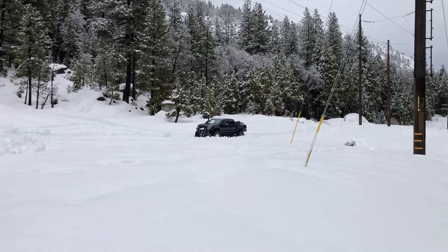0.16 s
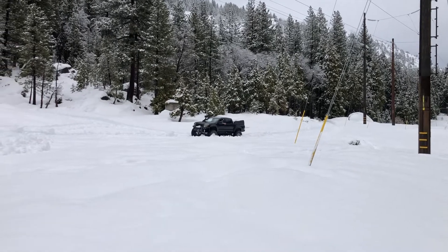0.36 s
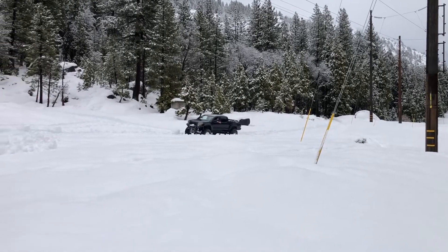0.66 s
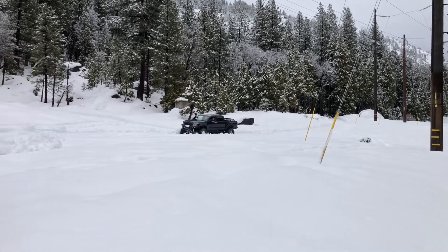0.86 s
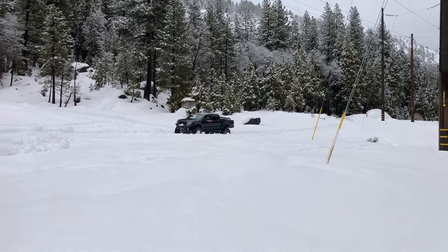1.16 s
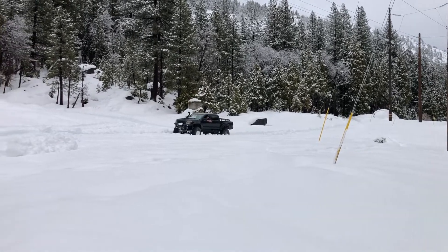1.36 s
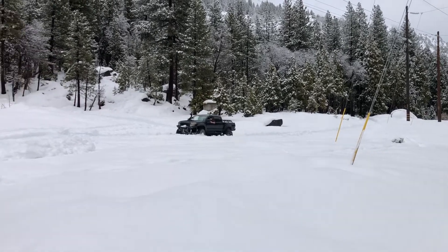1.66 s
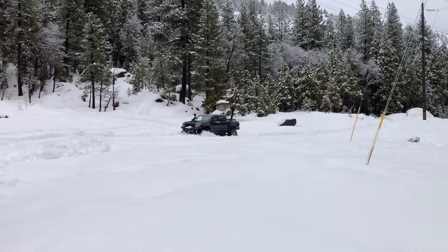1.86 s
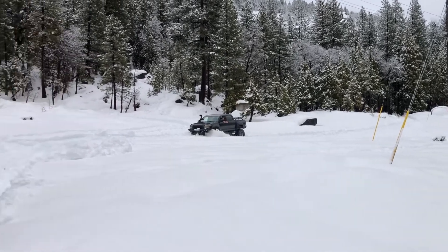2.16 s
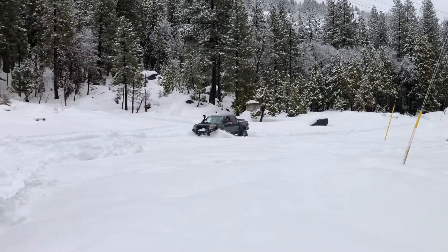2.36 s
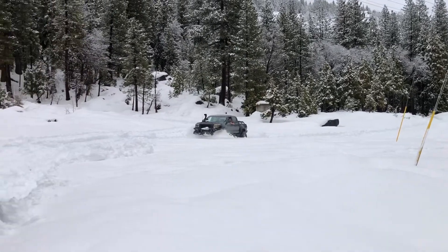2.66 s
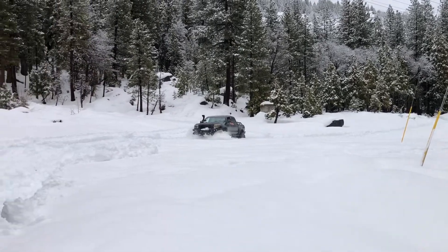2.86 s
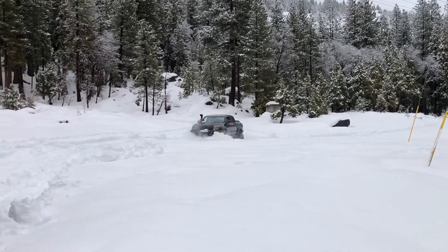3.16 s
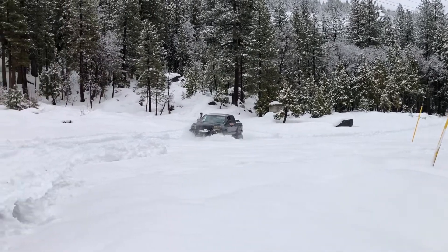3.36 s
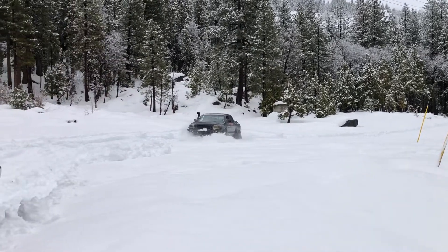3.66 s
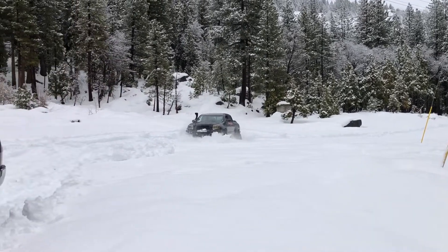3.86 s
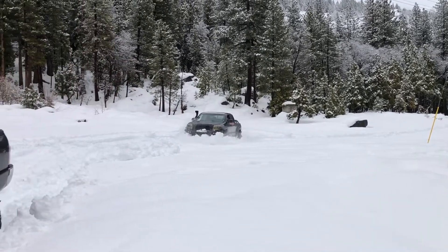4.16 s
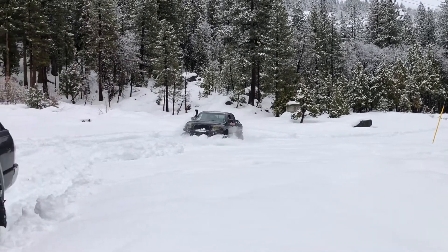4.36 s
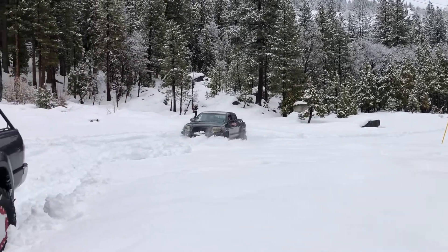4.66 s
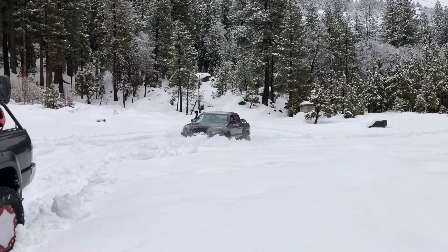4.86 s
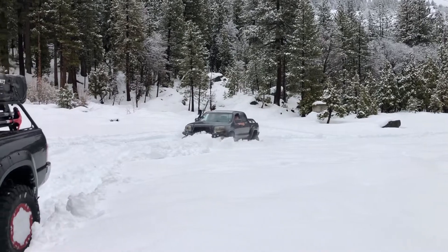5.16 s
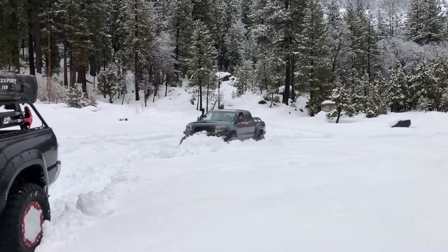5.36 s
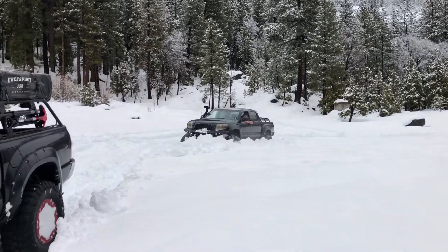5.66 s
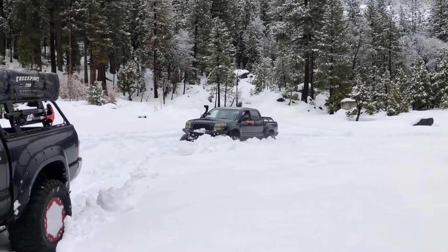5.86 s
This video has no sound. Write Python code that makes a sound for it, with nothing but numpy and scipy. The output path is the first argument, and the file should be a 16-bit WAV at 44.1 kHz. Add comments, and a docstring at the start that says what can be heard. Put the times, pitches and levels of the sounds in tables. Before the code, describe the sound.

A pickup truck ploughs through deep snow at high revs, its exhaust droning and stumbling over a hiss of spray.

```python
"""Pickup ploughing through deep snow

One microphone by a line of trees, some way off from a six-cylinder pickup that revs up and holds high
revs. Its exhaust drones and rasps, ducks as the truck pitches, and stumbles now and then.
The engine bay roars, the spinning tyres fling hissing snow, and a soft steady rush lies under it all."""
import sys
import numpy as np
from scipy import signal
from scipy.fft import rfft, irfft, next_fast_len
from scipy.io import wavfile
from scipy.ndimage import uniform_filter1d, map_coordinates

SR = 44100
rng = np.random.default_rng(int(sys.argv[2]) if len(sys.argv) > 2 else 0)


def digitize_waveform(pressure):
    """Quantize a signal to 16-bit integers and store it at the path in sys.argv[1].

    Rows of a 2-D input are taken as channels; values are limited to [-1, 1].
    """
    field = np.atleast_2d(pressure).T
    bounded = np.clip(field, -1, 1)
    quanta = np.round(bounded * 32767).astype(np.int16)
    wavfile.write(sys.argv[1], SR, quanta)


N = 265041
T = np.arange(N) / SR

# Bursts of uneven firing. Each row: time in seconds, level in dB.
STUMBLES = [(1.54, -42), (1.71, -43), (2.76, -34.5), (2.825, -34.5), (3.28, -29.5), (3.465, -28),
            (3.535, -29.5), (4.115, -31), (4.335, -26), (4.475, -26.5), (4.61, -28), (4.7, -24.5),
            (5.305, -28.5)]
# The six cylinders. Each entry: relative strength of its firing in dB.
CYLINDERS = [9.5, -19, 5, -19, -45, 15.5]


def exhaust(speed, cycle, count, load_db, duck_db, flare_s=0.01):
    """The tailpipe: drone, rasp and stumbles, driven by the load and ducking as the truck pitches."""
    # Upper registers against the boom. Each row: time in seconds, then body, bark and rasp in dB.
    tone = [(1.2, 9, -4, -24), (1.4, 2, 1, -32), (1.55, 3, 1.5, -23), (1.82, 5.5, 0.5, -4),
            (2.02, 2, -10.5, -8.5), (2.22, 1.5, -7, -16), (2.36, 0.5, -6, -6), (2.75, 0.5, 1, -4.5),
            (4.5, 0, -1.5, -7.5), (4.72, 1, 0, -5), (5.18, 0, 0, -6), (5.66, -0.5, -1.5, -7.5),
            (5.82, 1.5, 5, -3), (5.91, -11, -27, -8)]
    body, bark, edge = curves(tone)
    # each stumble briefly sharpens the bark and rasp
    flare_db = 2 * sum(np.exp(-.5 * ((T - s) / flare_s) ** 2) for s, _ in STUMBLES)
    boom_db = load_db - duck_db
    body_db = load_db + body - 0.96 * duck_db
    bark_db = load_db + bark - 0.73 * duck_db + flare_db
    rasp_db = load_db + edge - 11 * np.tanh(duck_db / 4.5) + flare_db  # first to go in a duck
    # no two cycles burn alike, and the upper registers show it most
    accent_db = -0.14 * wobble(47)
    registers = [boom_db + accent_db / 2, body_db + accent_db,
                 bark_db + accent_db, rasp_db - 1 + 2 * accent_db]
    return drone(speed, cycle, registers) + rasp(cycle, count, rasp_db) + stumble(cycle, count, boom_db)


def drone(speed, cycle, registers, lugging_speed=37, full_speed=46.6, shimmer_db=0.8, dispersion=.33):
    """Clean engine orders sweep through the pipe's resonances in four registers."""
    # Orders entering the pipe. Each row: multiple of the cycle rate, relative dB lugging and at full revs.
    orders = [(3, -16, -16), (4, -21, -13.5), (5, -22, -8), (6, 10, 2), (7, -6, -24), (8, -13, -42),
              (9, -11, 6.5), (10, -29, -5), (11, -10, 0.5), (12, 2, 0.5), (13, -15, -17), (14, -9.5, -8),
              (15, -18, -20), (16, -33, -29.5), (17, -21, 2.5), (18, -4.5, -4.5), (19, -16.5, -12.5),
              (20, -10, -31), (21, -19, -2.5), (22, -24, -23), (23, -9, 5.5), (24, -23, -10), (25, -6, -18),
              (26, -5, -6.5), (27, -29, -2), (28, -37, -2), (29, -4, 2), (30, -29, -6.5), (31, 2, -11.5)]
    orders = np.array(orders, float)
    multiples, levels = np.round(orders[:, 0]), orders[:, 1:]
    slow = slice(None, None, SR // 400)  # gains move about 400 times a second
    hz = multiples[:, None] * speed[slow]
    # the balance of the orders changes as the revs first build, then holds
    reached = np.maximum.accumulate(speed[slow])
    gains = amp([np.interp(reached, [lugging_speed, full_speed], row) for row in levels]) * abs(pipe(hz))
    above = [1 / (1 + (edge_hz / hz) ** 24) for edge_hz in (350, 700, 1000)]
    shares = -np.diff([np.ones_like(hz), *above, np.zeros_like(hz)], axis=0)
    # a register stays quiet until orders have climbed into it
    sizes = sum(amp(db[slow]) * gains * share * share.max(axis=0) / np.linalg.norm(gains * share, axis=0)
                for db, share in zip(registers, shares))
    shimmer = unit(uniform_filter1d(rng.standard_normal(sizes.shape), size=14, axis=1))
    sizes = sizes * amp(shimmer_db * shimmer)
    # the crank turns less evenly while the engine lugs at low revs
    flutter_cycles = np.interp(T, [1.25, 1.35, 1.7, 1.95], [0.0012, 0.0083, 0.0083, 0.0012])
    phase = 2 * np.pi * (cycle + flutter_cycles * wobble(60))
    # the pipe smears each cycle in time: first the body, then the bark, then the rasp
    smear = np.cumsum(dispersion * np.minimum(multiples, 4 * len(CYLINDERS)))
    lags = np.angle(pipe(multiples * full_speed)) - smear
    return np.sqrt(2) * sum(np.interp(T, T[slow], size) * np.sin(k * phase + lag)
                            for k, size, lag in zip(multiples, sizes, lags))


def rasp(cycle, count, rasp_db):
    """Unequal firings give the exhaust a hard edge that throbs once a cycle."""
    # Colour of that edge. Each row: frequency in Hz, relative level in dB.
    spectrum = [(500, -49), (900, -12.5), (1060, 52.5), (1170, -0.5), (1330, 15), (1430, -27), (1500, 1),
                (1750, 11), (2050, 1), (2600, -23), (4000, -38)]
    sizes = amp(np.resize(CYLINDERS, count) + 0.4 * rng.standard_normal(count))
    return amp(rasp_db - 12.5) * coloured(firings(cycle - .3, sizes, jitter=0.0013), spectrum)


def stumble(cycle, count, boom_db, width_s=0.016, thud_db=-15):
    """Firings of uneven strength ring the pipe: when lugging at low revs, and in short thudding blats."""
    # The thud of a stumble. Each row: frequency in Hz, relative level in dB.
    thud = [(35, -48), (60, 7), (85, 25), (120, -21), (170, -25), (500, -45)]
    sizes = np.tanh(2 * rng.standard_normal(count))
    uneven = unit(filtered(firings(cycle, sizes, jitter=0.08), pipe))
    blats = sum(amp(db) * np.exp(-.5 * ((T - s) / width_s) ** 2) for s, db in STUMBLES)
    roughness = amp(boom_db + np.interp(T, [1.8, 2.05], [-6, -28]))  # fades as the lugging ends
    return uneven * (blats + roughness) + amp(thud_db) * blats * noise(thud)


def pipe(hz, gap_hz=771.3, gap_width_hz=48, gap_db=-27):
    """The exhaust pipe's resonances, with a gap that swallows any order passing through it."""
    # Each row: centre in Hz, width in Hz, gain in dB.
    resonances = [(84.97, 53, -21.5), (266.3, 100, -16), (515, 45, 0.5), (858, 94, -10.5), (1187, 112, -7),
                  (1316, 316, -11)]
    def ring(centre, width):
        return 1j * hz * width / (centre ** 2 - hz ** 2 + 1j * hz * width)
    peaks = sum((-1) ** k * amp(db) * ring(centre, width)
                for k, (centre, width, db) in enumerate(resonances))
    return peaks * (1 - (1 - amp(gap_db)) * ring(gap_hz, gap_width_hz))


def firings(cycle, sizes, jitter):
    """One pulse per cylinder, six a cycle; jitter is in firing intervals."""
    due = (np.arange(len(sizes)) + jitter * rng.standard_normal(len(sizes))) / len(CYLINDERS)
    at = np.interp(due, cycle, np.arange(N))
    # a windowed sinc places each pulse between samples
    taps = at.astype(int)[:, None] + np.arange(-7, 9)
    offset = taps - at[:, None]
    pulses = sizes[:, None] * np.sinc(offset) * np.cos(np.pi * offset / 16) ** 2
    return np.bincount(np.clip(taps, 0, N - 1).ravel(), pulses.ravel(), N)


def crank_speed(sag=0.9, recover_s=0.07):
    """Cycles per second: the revs climb and hold; each stumble costs some speed, soon won back."""
    # Revs before the sags. Each row: time in seconds, four-stroke cycles per second.
    revs = [(1.1, 25.1), (1.26, 27.1), (1.55, 34.4), (1.65, 35.3), (1.84, 38.15), (2.01, 40.1),
            (2.13, 43.2), (2.33, 45.75), (2.57, 45.9), (2.72, 47.35), (2.95, 46.25), (3.24, 47.3),
            (3.46, 47.4), (3.66, 46.6), (4.04, 47.1), (4.66, 47.25), (4.86, 46.85), (5.0, 45.95),
            (5.26, 46.9), (5.52, 45.65), (5.74, 46.35), (5.85, 45.1), (6.0, 45.5)]
    sags = sum(np.interp(T - s, [-.02, .012], [0, 1]) * np.exp(-np.maximum(T - s, 0) / recover_s)
               for s, _ in STUMBLES)
    return curves(revs)[0] - sag * sags


def pitching():
    """How many dB the exhaust's boom ducks: a bell-shaped dip each time the truck pitches."""
    # Each row: centre in seconds, half-length in seconds, depth in dB.
    ducks = [(1.624, 0.032, 9), (1.906, 0.04, 9), (2.17, 0.046, 9), (2.5, 0.064, 10.5), (2.932, 0.062, 12),
             (3.357, 0.048, 12), (3.662, 0.053, 8), (4.085, 0.064, 3.5), (4.945, 0.056, 15),
             (5.425, 0.1, 13)]
    return sum(db * np.exp(-abs((T - s) / half) ** 1.9) for s, half, db in ducks)


def engine_bay(speed, cycle, count, duck_db, beat=0.061, clatter_db=-8, roar_db=-4):
    """Intake and fan roar that beats with the firings, over valve clatter and accessory whine."""
    # The whole bay before ducking. Each row: time in seconds, level in dB.
    level = [(0.5, -49.5), (1.05, -57), (1.45, -43.5), (1.82, -36.5), (2.42, -34.5), (2.74, -29),
             (4.1, -30), (4.7, -28.5), (5.8, -29.5), (6.01, -33.5)]
    # Colour of roar and clatter. Each row: frequency in Hz, relative level in dB.
    spectrum = [(400, -60), (900, 3), (1300, 1), (1750, 2), (1900, 4), (2030, 3), (2350, -1.5), (2600, -7),
                (2850, -2.5), (3400, -17), (4500, -18), (8000, -80)]
    # Accessory tones, heard at high revs. Each row: multiple of the cycle rate, dB against the bay.
    accessories = [(33, -16.5), (37, -15), (43, -11), (47, -17.5), (53, -18)]
    beating = 1 + beat * np.cos(2 * np.pi * len(CYLINDERS) * cycle)
    roar = coloured(rng.standard_normal(N) * beating, spectrum)
    sizes = amp(np.resize(CYLINDERS[::-1], count) / 2 + .5 * rng.standard_normal(count))
    clatter = coloured(firings(cycle + .3, sizes, jitter=0.001), spectrum)
    tones = sum(amp(db) * whine(k * speed) for k, db in accessories)
    tones *= np.interp(speed, [43, 46.8], [0, 1])
    bay_db = curves(level)[0] - 0.23 * duck_db
    return amp(bay_db) * (amp(roar_db + 1.5 * wobble(7.4)) * roar + amp(clatter_db) * clatter + tones)


def drivetrain():
    """The drivetrain whines, and its pitch sags as the truck bogs down."""
    # Each row: time in seconds, pitch in Hz, level in dB.
    glide = [(1.1, 1750, -85), (2.4, 1800, -60), (3.2, 1930, -39), (3.6, 1860, -53), (4.8, 1870, -57),
             (5.2, 1930, -42), (5.5, 1885, -39), (5.8, 1810, -40), (6.01, 1660, -44)]
    hz, db = curves(glide)
    return amp(db) * whine(hz, waver_hz=8.2)


def snow(clumping_db=0.5, knee_db=-40.5):
    """Spinning tyres throw clumps of snow and a mist of powder."""
    # Spray off the tyres. Each row: time in seconds, level in dB.
    level = [(0.5, -54), (1.05, -56), (1.27, -51.5), (1.53, -41.5), (1.65, -43.5), (2.16, -38),
             (2.55, -43.5), (3.2, -41), (4.35, -42), (5.05, -41.5), (5.36, -38.5), (5.55, -40.3),
             (5.78, -38.5), (6.0, -44.5)]
    # Hiss of the clumps and of the finer powder. Each row: frequency in Hz, relative level in dB.
    clump_hiss = [(1940, -12.5), (3300, -1), (4150, -7), (4810, -1), (5560, -1.5), (7110, -7.5), (9680, -8),
                  (11500, -20.5), (15000, -42), (22000, -120)]
    powder_hiss = [(6000, -16), (9500, -1), (11000, -3.5), (12000, -3.5), (14000, -0.5), (16000, -2.5)]
    spray_db, = curves(level)
    # powder lies under the spray, and rises faster once the spray passes the knee
    powder_db = spray_db - 7.5 + 0.98 * np.maximum(spray_db - knee_db, 0)
    clumps = rng.standard_normal(N) * amp(clumping_db * wobble(900))
    spray = amp(spray_db + 0.62 * wobble(25)) * coloured(clumps, clump_hiss)
    return spray + amp(powder_db + 0.74 * wobble(17)) * noise(powder_hiss)


def rumble(load_db, idle_db=-61.5, reference_db=-22):
    """A low rumble builds as the truck gets going and comes nearer."""
    # Each row: frequency in Hz, relative level in dB.
    spectrum = [(25, -51), (37, -5), (47, -11), (90, -6), (160, -6), (350, -11), (700, -7.5), (1500, -27),
                (3000, -34)]
    reached_db = np.maximum.accumulate(load_db) - reference_db
    return np.hypot(amp(idle_db), amp(-45 + 0.81 * reached_db)) * noise(spectrum)


def tree_echo(x, t60_s=0.49, build_s=0.16, dull_hz=2500, level_db=-18):
    """The line of trees sends a faint, dull scatter back to the microphone."""
    t = T[:SR]
    tail = rng.standard_normal(SR) * amp(-60 * t / t60_s) * (1 - np.exp(-(t / build_s) ** 2))
    echo = signal.fftconvolve(x, tail / np.linalg.norm(tail))[:N]
    return amp(level_db) * filtered(echo, lambda hz: 1 / (1 + 1j * hz / dull_hz))


def ambience(rush_db=-48):
    """A soft steady rush under everything, with a few faint hums."""
    # The rush. Each row: frequency in Hz, relative level in dB.
    spectrum = [(15, -37), (25, 2), (70, -1.5), (174, -0.5), (324, -1), (425, -6), (461, -1.5), (500, -2),
                (1120, -8), (1220, -5.5), (1510, -6.5), (1930, -4), (2200, -8.5), (3780, -9),
                (15800, -50.5)]
    # Each row: pitch in Hz, level in dB.
    hums = [(474, -66), (1238, -67), (1863, -63), (2794, -67)]
    rush = amp(rush_db + 0.68 * wobble(3)) * noise(spectrum)
    return rush + sum(amp(db) * whine(hz) for hz, db in hums)


def whine(hz, waver_hz=3):
    """A slightly unsteady tone of rms about 1."""
    phase = 2 * np.pi * np.cumsum(hz + waver_hz * wobble(25)) / SR
    return np.sqrt(2) * np.sin(phase) * amp(2.46 * wobble(9.6))


def amp(db):
    """Decibels to gain."""
    return 10 ** (np.asarray(db) / 20)


def unit(x):
    """Scale to rms 1."""
    return x / np.sqrt(np.mean(x ** 2) + 1e-20)


def curves(rows):
    """One value per sample for each column after the time."""
    times, *columns = np.transpose(rows)
    return [np.interp(T, times, column) for column in columns]


def wobble(rate):
    """A smooth random curve, rate knots a second."""
    return map_coordinates(rng.standard_normal(int(N * rate / SR) + 4), [T * rate])


def filtered(x, response):
    """x through a complex response of frequency."""
    size = next_fast_len(N + SR // 2)
    return irfft(rfft(x, size) * response(np.fft.rfftfreq(size, 1 / SR)), size)[:N]


def coloured(x, points):
    """x through a causal filter of (Hz, dB) points, at rms 1."""
    point_hz, point_db = np.transpose(points)
    def response(hz):
        gain = amp(np.interp(np.log(hz + 1), np.log(point_hz + 1), point_db))
        # minimum phase: the ringing follows its cause
        mirrored = np.log(np.r_[gain, gain[-2:0:-1]])
        phase = -signal.hilbert(mirrored).imag[:len(gain)]
        return gain * np.exp(1j * phase)
    return unit(filtered(x, response))


def noise(points):
    """Coloured noise of rms 1."""
    return coloured(rng.standard_normal(N), points)


def scene():
    """What reaches the microphone: the truck, its echo, the flung snow and the background."""
    # Exhaust under load, growing as the truck revs up and comes nearer. Each row: seconds, level in dB.
    load = [(1.06, -60.5), (1.3, -51.5), (1.37, -40), (1.84, -35.5), (2.0, -28.5), (2.4, -25.5),
            (2.8, -25.5), (3.45, -22.5), (4.0, -21.5), (4.32, -20), (4.56, -22.5), (4.8, -21),
            (5.66, -19.5), (5.74, -26), (5.83, -41), (5.91, -38), (6.0, -41)]
    load_db, = curves(load)
    speed = crank_speed()
    cycle = np.cumsum(speed) / SR
    count = int(cycle[-1] * len(CYLINDERS))  # firings in all
    duck_db = pitching()
    throttle = np.interp(T, [1.02, 1.14], [0, 1])
    drive = exhaust(speed, cycle, count, load_db, duck_db) + drivetrain()
    truck = throttle * drive + engine_bay(speed, cycle, count, duck_db) + rumble(load_db)
    background = ambience()
    return (truck + tree_echo(truck) + snow() + background)[None]


def record(dry, low_hz=35, top_hz=15750):
    """The microphone drops the deepest bass and keeps nothing above its band limit."""
    def response(hz):
        return (hz < top_hz) * hz ** 4 / (hz ** 4 + low_hz ** 4)
    return np.array([filtered(x, response) for x in dry])


dry = scene()
out = record(dry)
digitize_waveform(out)
```